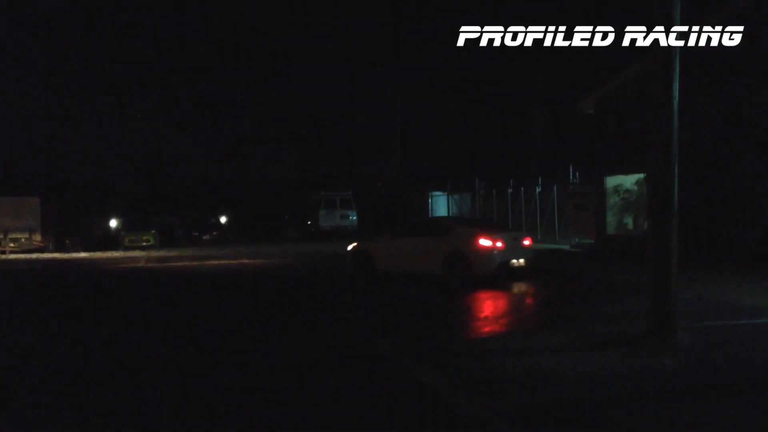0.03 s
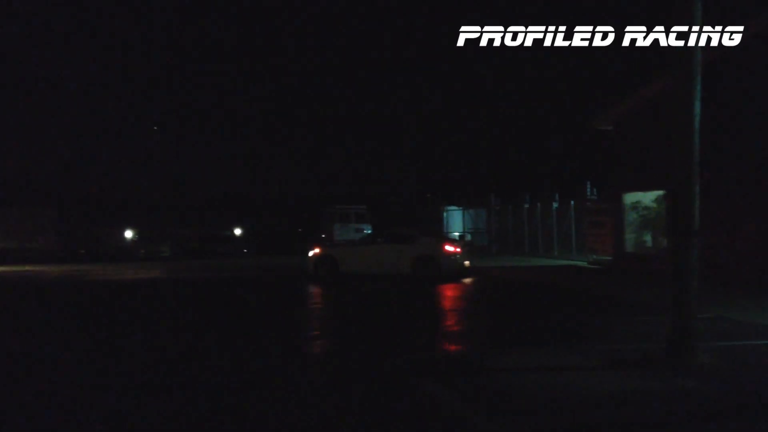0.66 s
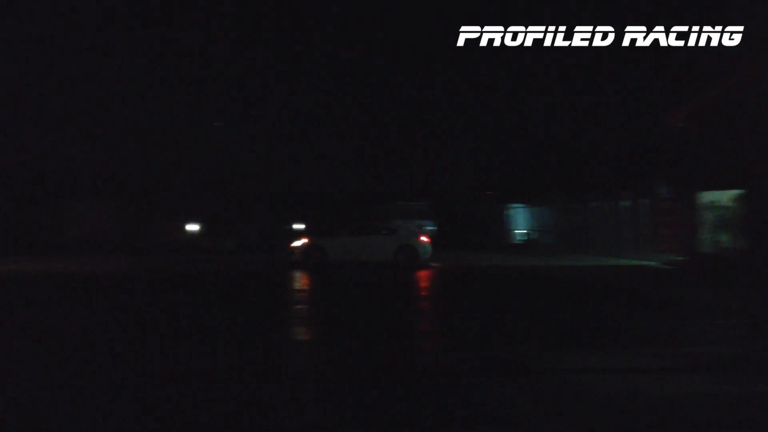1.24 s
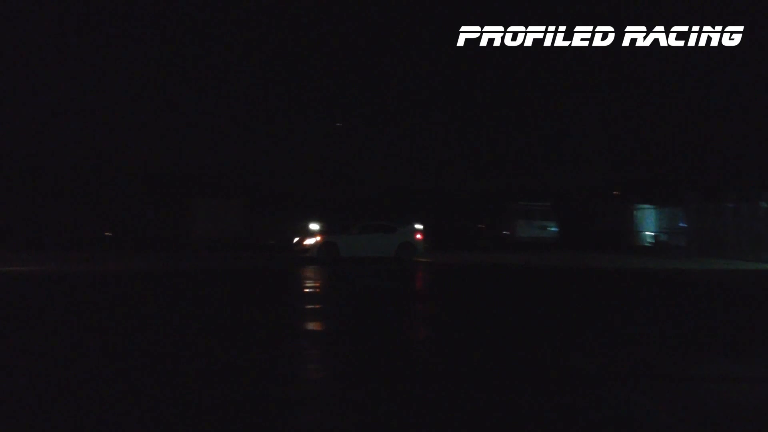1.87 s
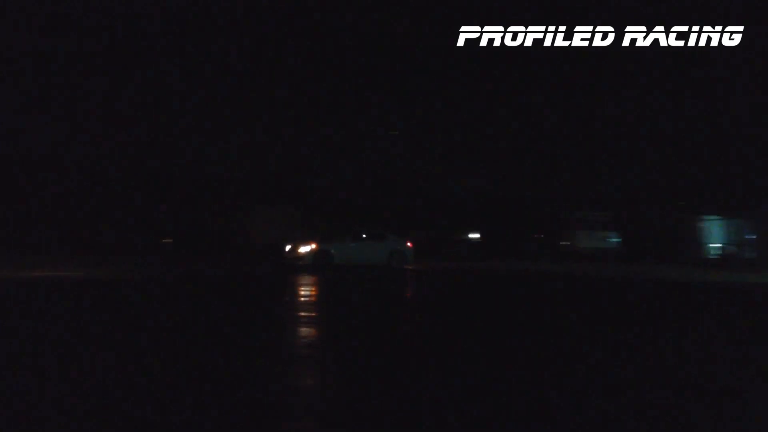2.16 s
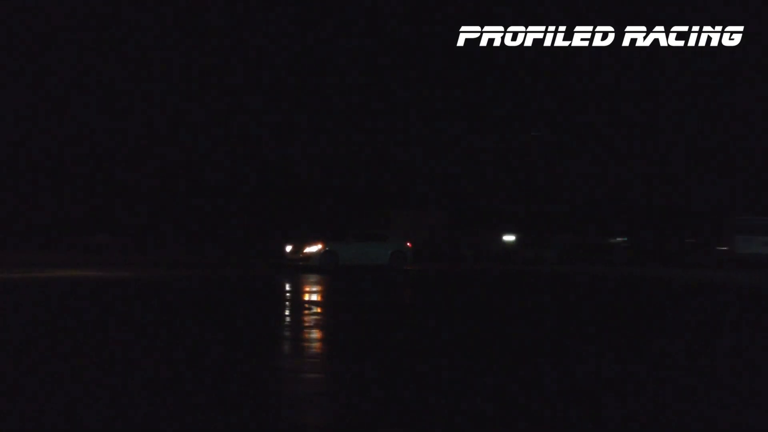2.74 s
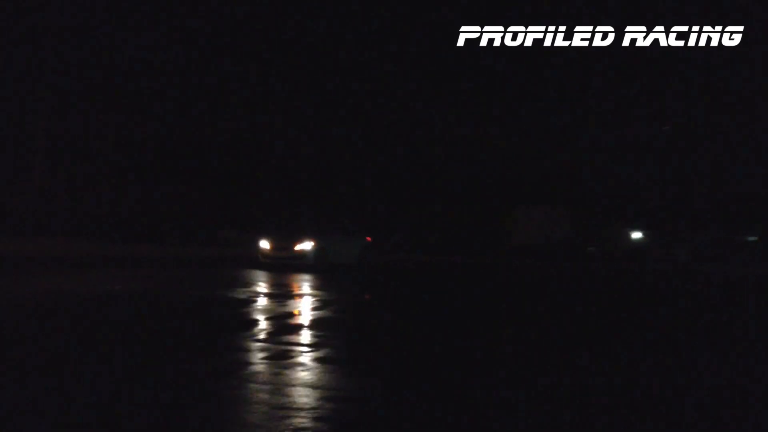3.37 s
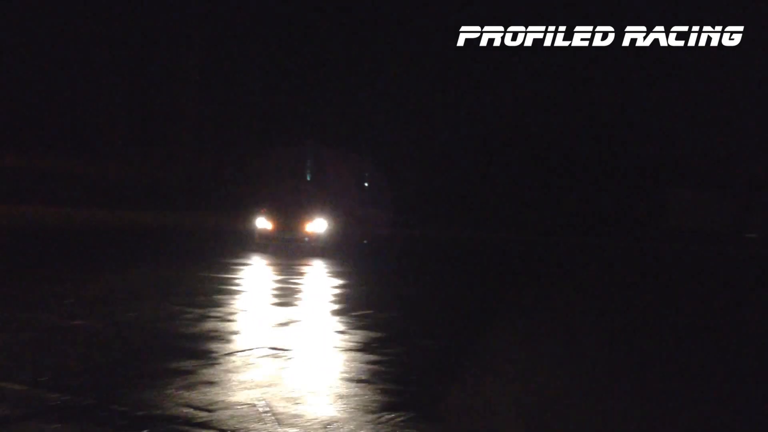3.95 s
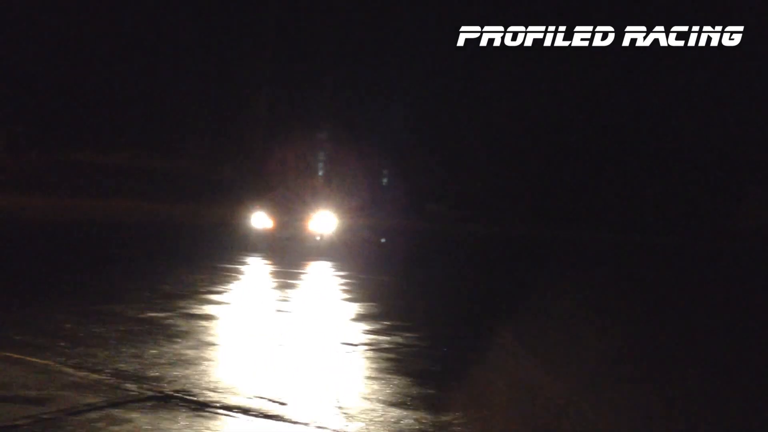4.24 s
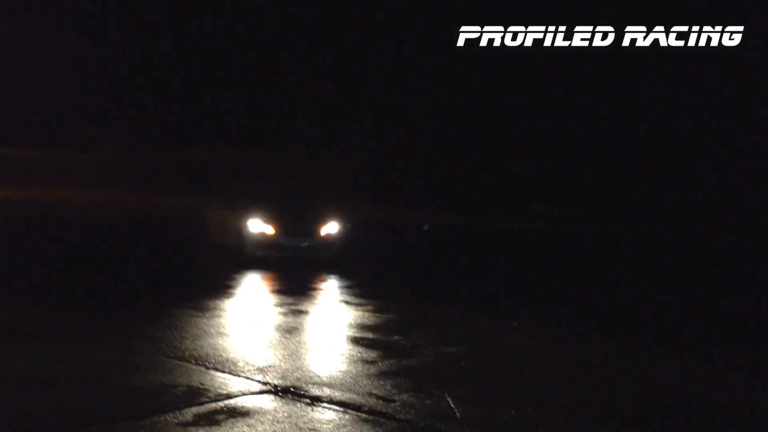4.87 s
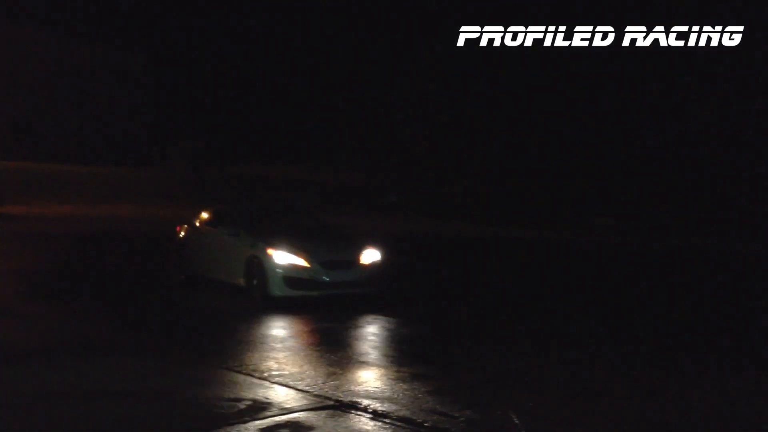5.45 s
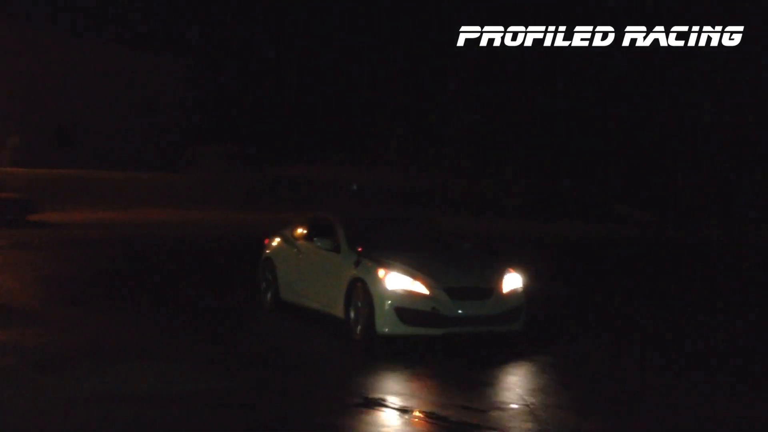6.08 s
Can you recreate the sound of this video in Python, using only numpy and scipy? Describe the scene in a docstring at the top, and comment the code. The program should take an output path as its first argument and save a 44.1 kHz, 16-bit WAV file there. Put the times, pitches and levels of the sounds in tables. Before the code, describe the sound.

Heard from straight ahead in an open lot with a faint echo, a six-cylinder car revs as it slides on wet asphalt. Brief chirps give way to a wavering tyre howl over rubber scrub and hissing water. The engine rises to a raspy roar, then the throttle shuts and the pitch sinks. One more keen squeal and several quick chirps follow, leaving a low idle and light spray.

```python
"""On a wet, open lot a six-cylinder coupe drifts, revs up, lifts off and slides to a crawl.
Periodic firing makes the exhaust drone, burble and rasp, while turbulence roars in the intake.
Stick-slip friction makes the tyres howl, squeal keenly in the last slide and chirp.
Rubber scrubs and spray hisses under the wheels, and distant buildings answer faintly."""
import sys
import numpy as np
from scipy import signal
from scipy.fft import rfft, irfft, next_fast_len
from scipy.io import wavfile
from scipy.ndimage import uniform_filter1d, minimum_filter1d, map_coordinates

SR = 44100
rng = np.random.default_rng(int(sys.argv[2]) if len(sys.argv) > 2 else 0)


def file_out(sig):
    """Save sig as 16-bit WAV at sys.argv[1]."""
    # one column per channel
    cols = np.atleast_2d(sig).T
    # limit, then scale
    lim = np.clip(cols, -1, 1)
    pcm = np.round(lim * 32767).astype(np.int16)
    wavfile.write(sys.argv[1], SR, pcm)


N = 274025


def engine(jitter=.004, pulsation_depth=.063):
    """Periodic excitation: the firing rate sets the exhaust's harmonics and modulates the gas flow."""
    # engine speed: time_s, firing_hz
    engine_speed = [(0, 105.6), (.12, 112.8), (.21, 107), (.38, 103.2), (.5, 95.3), (.68, 97.6),
                    (.85, 92.45), (1.2, 107.7), (1.78, 118.9), (1.97, 115.3), (2.15, 118.2), (2.62, 118.3),
                    (3.02, 126), (3.33, 149.5), (3.6, 156.4), (3.94, 174.7), (4.12, 148.5), (4.29, 126.6),
                    (4.5, 100.4), (4.8, 77.35), (5.13, 61.23), (5.5, 53.4), (6.2, 53.97)]
    firing_hz, = curves(engine_speed)
    revs = firing_hz / 150
    shut = 1 - throttle()
    firings = np.cumsum(firing_hz * (1 + jitter * wobble(35))) / SR
    pulsation = 1 + pulsation_depth * np.cos(2 * np.pi * firings)
    exhaust = drone(firings, firing_hz, revs, shut) + burble(firings, firing_hz, revs, shut)
    return exhaust + rasp(firings, pulsation, revs, shut) + intake(pulsation) + thump()


def throttle(attack_s=.18):
    """A valve meters the air: its opening, 0-1, rises, holds and falls with each press."""
    # two blips, a long pull, a light touch: open_s, until_s, release_s, opening_share
    presses = [(.09, 0.16, 0.21, 0.91), (.61, 0.68, 0.15, 0.9), (.96, 3.854, 0.39, 0.91),
               (4.58, 4.74, .15, 0.13)]
    return sum(curves([(on - attack_s, 0), (on, opening), (off, opening), (off + release, 0)])[0]
               for on, off, release, opening in presses)


def harmonic(firings, k, db, flutter_db=2.5):
    """Periodic firing radiates at whole multiples of its rate; this is the k-th, fluttering in level."""
    return amp(db + flutter_db * wobble(28)) * np.sqrt(2) * np.sin(2 * np.pi * k * firings)


def drone(firings, firing_hz, revs, shut, shut_db=(-16.5, -19, -19.5), lope=.19):
    """Resonance: harmonics 1-3 boom at certain revs; uneven firing shakes them, most at high revs."""
    # exhaust boom at full throttle: firing_hz, first_db, second_db, third_db
    boom = [(54.21, -44, -31, -22.5), (67.46, -48, -17.5, -13), (79.93, -21.5, -15.5, -30.5),
            (91.3, -19.5, -19.5, -22), (109.3, -25.5, -20.5, -22.5), (111, -16.5, -16, -27.5),
            (122, -19.5, -11.5, -27.5), (135.7, -18.5, -15, -34), (145.6, -13, -20, -21),
            (153.75, -12.5, -17.5, -14), (172, -20.5, -19.5, -50), (177.05, -10, -24, -37)]
    # one harmonic briefly swells or fades: centre_s, half_length_s, harmonic_number, gain_db
    swings = [(1.1, 0.17, 2, 8), (1.54, 0.04, 2, -22), (2.38, 0.16, 1, -14.5), (2.646, 0.18, 2, -8),
              (2.87, 0.056, 1, -12), (3.42, 0.056, 1, -16), (3.71, 0.064, 1, -6), (4.643, 0.088, 2, 7.5),
              (6.1, 0.26, 3, 6)]
    # low surges after the throttle shuts: centre_s, half_length_s, level_db
    surges = [(4.004, .03, -15.5), (4.107, 0.038, -20), (4.284, 0.046, -15.5)]
    levels_db = [db + cut_db * shut for db, cut_db in zip(curves(boom, firing_hz), shut_db)]
    for s, half_s, k, db in swings:
        levels_db[round(k) - 1] += db * swell(s, half_s)
    surge = sum(amp(db) * swell(s, half_s) for s, half_s, db in surges)
    levels_db[0] = 20 * np.log10(np.hypot(amp(levels_db[0]), surge))
    tone = sum(harmonic(firings, k, db) for k, db in enumerate(levels_db, 1))
    return tone * (1 + lope * revs ** 2 * wobble(60))


def burble(firings, firing_hz, revs, shut, db_per_octave=3, shut_db=-7):
    """Muffler resonances lift harmonics 4-6 as they pass; at high revs gas noise takes over."""
    # muffler response: frequency_hz, gain_db
    muffler = [(20, -48), (80, -64), (110, -8.5), (150, -7), (210, -5), (295, -2.5), (345, -1.5),
               (405, -7.5), (480, -9.5), (560, -34.5), (1200, -103)]
    # the overtones stand out at middling revs: firing_hz, gain_db
    clarity = [(55, -5), (85, -22), (97, 4), (107, -10.5), (120, -22)]
    # the burble swells as the revs fall: centre_s, half_length_s, gain_db
    overrun = (4.27, 0.22, 6.9)
    overtones = sum(harmonic(firings, k, along(muffler, k * firing_hz) + 2 * wobble(6))
                    for k in (4, 5, 6))
    gas = np.sqrt(revs) * rush(muffler, patchy_db=1)
    level_db = -24 + db_per_octave * np.log2(revs) + shut_db * shut + overrun[2] * swell(*overrun[:2])
    return amp(level_db) * (amp(curves(clarity, firing_hz)[0]) * overtones + gas)


def rasp(firings, pulsation, revs, shut, pulse_share=.25, db_per_octave=7, shut_db=-14):
    """Pipe resonances colour the firing pulses and the turbulent flow, louder as the revs climb."""
    # pipe response: frequency_hz, gain_db
    pipe = [(330, -21), (420, 0), (490, -2), (600, -6.5), (790, 2.5), (980, -5.5), (1250, -8), (1700, -11),
            (2300, -28.5), (5000, -85)]
    pulses = np.sqrt(pulse_share) * coloured(pipe_pulses(firings), pipe)
    flow = np.sqrt(1 - pulse_share) * unit(pulsation * rush(pipe, patchy_db=1))
    return amp(-17.5 + db_per_octave * np.log2(revs) + shut_db * shut) * (pulses + flow)


def pipe_pulses(firings, uneven=.29, t60_s=.034):
    """Reflections in the pipe smear an impulse train: one pulse a firing, sized by its cylinder."""
    fired = np.flatnonzero(np.diff(np.floor(firings)))
    cylinders = np.resize(1 + uneven * unit(rng.standard_normal(6)), len(fired))
    pulses = np.zeros(N)
    pulses[fired] = cylinders * amp(2 * rng.standard_normal(N)[fired])
    t = np.arange(SR // 25) / SR
    echoes = rng.standard_normal(len(t)) * amp(-60 * t / t60_s)
    return signal.fftconvolve(pulses, echoes)[:N]


def intake(pulsation):
    """Pulsating turbulence roars through the resonances of the airbox."""
    # airbox response: frequency_hz, gain_db
    airbox = [(500, -36), (850, -11), (1200, 2), (1400, -0.5), (1600, -1.5), (1950, -9.5), (2500, -15),
              (4000, -60)]
    # intake roar: time_s, level_db
    roar = [(0, -25.5), (1, -28), (1.6, -21.5), (3.5, -23), (3.95, -20), (4.1, -25.5), (4.4, -21.5),
            (4.9, -22.5), (5.1, -23), (5.7, -33), (6.2, -43.5)]
    return amp(curves(roar)[0]) * unit(pulsation * rush(airbox, patchy_db=3.5))


def thump(lift_off_s=3.985, ring_hz=115, gain_db=-11, rise_s=.023, t60_s=.25):
    """Damped oscillation: a soft puff rings the muffler as the throttle shuts."""
    t = np.maximum(np.arange(N) / SR - lift_off_s, 0)
    return amp(gain_db - 60 * t / t60_s) * (1 - np.exp(-t / rise_s)) * np.sin(2 * np.pi * ring_hz * t)


def tyres(judder_db=1.73, judder_per_s=24):
    """Friction drives chirps and long slides, which judder as grip varies; returns sound and screech."""
    # short skids: start_s, end_s, pitch_hz, glide_hz_per_s, level_db, lead_share, screech_db,
    # second_db, third_db, fourth_db
    chirps = [(0.086, 0.167, 1157, 459, -17, 0.27, -18, -8, -15, -17.5),
              (.428, 0.473, 1243, -2, -16.5, 0.1, -14.5, -5.5, -10.5, -18),
              (0.798, 0.813, 3060, 2500, -32, 0.87, -18, -30, -40, -38),
              (1.007, 1.127, 1190, -4, -14, 0.56, -19.5, -7.5, -12.5, -12.5),
              (5.13, 5.2, 1246, 894, -11, 0.92, -15, -16.5, -12.5, -48),
              (5.272, 5.279, 1255, -900, -15.5, 0.27, -12, -42, -27, -37),
              (5.375, 5.393, 1192, 596, -13, 0.56, -10.5, -21, -8.5, -25),
              (5.521, 5.54, 1234, -800, -17, 0.64, -14, -30, -12, -32)]
    # wheelspin howl, the whistle above it and the last slide's squeal: time_s, pitch_hz, level_db
    howl = [(1.18, 1315, -11.5), (1.24, 1270, -20), (1.31, 1195, -11.5), (1.42, 1382, -20.5),
            (1.52, 1254, -11.5), (1.64, 1466, -16.5), (1.79, 1201, -15.5), (2.15, 1256, -13),
            (2.35, 1273, -19), (2.6, 1315, -14), (2.73, 1443, -14), (3.0, 1318, -15.5), (3.1, 1325, -25.5)]
    whistle = [(1.35, 2560, -25.5), (1.62, 2665, -23), (1.82, 2534, -33), (2.54, 2670, -22.5),
               (2.75, 2843, -18.5), (2.95, 2730, -26.5)]
    squeal = [(4.28, 1220, -26.5), (4.37, 1145, -29), (4.48, 1105, -17), (4.6, 1115, -11.5),
              (4.69, 1115, -12.5), (4.795, 1162, -15), (4.82, 1271, -24), (4.84, 1105, -10),
              (4.87, 1129, -15), (4.9, 1220, -12.5), (5.0, 1200, -13)]
    # the tread in each: gain_db, spread_share, lead_share, screech_db, overtones_db
    howl_tread = (-2.6, .08, 0.35, -16, [-10.5, -13, -23.5])
    whistle_tread = (-1.2, .045, 0.091, -18.5, [-16, -24])
    squeal_tread = (-1, .052, 0.67, -13, [-16.5, -6.5, -26])
    # the rubber bites harder: centre_s, half_length_s, gain_db
    bites = [(4.719, 0.0087, 10), (4.762, 0.0092, 3), (4.848, 0.011, 8), (4.897, 0.0056, 10.5)]
    out = sum(chirp(*row) for row in chirps)
    grip_db = judder_db * wobble(judder_per_s) + sum(db * swell(s, half_s) for s, half_s, db in bites)
    for path, (gain_db, *tread) in [(howl, howl_tread), (whistle, whistle_tread), (squeal, squeal_tread)]:
        out = out + skid(path, gain_db + grip_db, *tread)
    return out


def skid(path, grip_db, spread, lead, screech_db, upper_db, count=5, attack_s=.047, release_s=.042):
    """Detuned tread blocks beat around a purer leading tone; returns sound and screech envelope."""
    start, end = path[0][0], path[-1][0]
    span = np.arange(max(0, int((start - 2 * attack_s) * SR)), min(N, int((end + 2 * release_s) * SR)))
    t = span / SR
    pitch_hz, db = curves(path, t)
    edges_db = 20 * np.minimum(0, np.minimum((t - start) / attack_s, (end - t) / release_s))
    leader = stick_slip(pitch_hz, np.add(upper_db, -2), jitter=.012, flicker_db=1.2)
    blocks = 0
    for place in np.linspace(-1.3, 1.3, count):
        detune = spread * (place + .3 + .5 * wobble(14, len(span)))
        blocks += stick_slip(pitch_hz * (1 + detune), upper_db, jitter=.022, flicker_db=3.5)
    sound, envelope = np.zeros((2, N))
    envelope[span] = amp(db + edges_db + grip_db[span])
    sound[span] = envelope[span] * (np.sqrt(lead) * leader + np.sqrt((1 - lead) / count) * blocks)
    return np.array([sound, amp(screech_db) * envelope])


def stick_slip(pitch_hz, upper_db, jitter, flicker_db):
    """Relaxation oscillation: rubber grips and lets go in a shaky tone whose harmonics flare apart."""
    size = len(pitch_hz)
    waver = .6 * wobble(70, size) + 1.08 * wobble(480, size)
    phase = 2 * np.pi * np.cumsum(pitch_hz * (1 + jitter * waver)) / SR
    grip_db = flicker_db * wobble(110, size)
    return sum(amp(db) * unit(amp(grip_db + np.sqrt(k + 1) * wobble(71.4, size)) * np.sin(k * phase))
               for k, db in enumerate([0, *upper_db], 1))


def chirp(on, off, hz, glide, db, lead, screech_db, *upper_db, sag=.0363, spread=.034):
    """A brief burst of stick-slip whose pitch glides and sags in the middle."""
    end_hz = hz + glide * (off - on)
    path = [(on, hz, db), ((on + off) / 2, (1 - sag) * (hz + end_hz) / 2, db), (off, end_hz, db)]
    return skid(path, np.zeros(N), spread, lead, screech_db, upper_db)


def road(screech, screech_spray_db=-4, treble_hz=8800):
    """Friction noise and spray grow with each screech; directivity dulls the spray as the car turns."""
    # wheelspin and sliding: time_s, scrub_db, spray_db
    sliding = [(0, -31.5, -33.5), (.85, -34, -35.5), (1.25, -33.5, -37.5), (1.65, -22.5, -36),
               (2.2, -26, -44), (2.8, -20.5, -41.5), (3.12, -31, -34.5), (3.9, -21.5, -27.5),
               (4.15, -29.5, -36), (4.48, -26, -38), (4.87, -22.5, -29), (5.07, -35, -33.5),
               (5.72, -33, -33), (5.92, -40.5, -40), (6.2, -38, -38)]
    # spectra of rubber on asphalt and of thrown water: frequency_hz, density_db
    rubber = [(1200, -16.5), (2150, -15.5), (2650, 9), (3400, 11.5), (3900, 6.5), (4500, -0.5),
              (5000, -11.5), (6500, -73)]
    water = [(2500, -7.5), (4400, 0), (5050, -8), (5700, 1.5), (6600, 1.5), (7700, -7.5), (8600, -4),
             (9500, -13), (10400, -25), (11700, -10), (12600, -32), (13500, -37)]
    # the car turns away and back: time_s, treble_db
    facing = [(0, 1.5), (.9, 0.5), (1.2, -12.5), (2.2, -56), (2.9, -9.5), (3.5, -1), (4.2, 6), (5, -0.5),
              (6.2, 7.5)]
    scrub_db, spray_db = curves(sliding)
    scrub = np.hypot(amp(scrub_db), screech) * rush(rubber, patchy_db=3)
    spray = np.hypot(amp(spray_db), amp(screech_spray_db) * screech) * rush(water, patchy_db=3)
    treble = filtered(spray, lambda hz: 1 - 1 / (1 + (hz / treble_hz) ** 8))
    return scrub + spray + (amp(curves(facing)[0]) - 1) * treble


def lot(x):
    """Diffuse reflection: the buildings answer after 25 ms, and the treble dies first."""
    # reverberation time: frequency_hz, t60_s
    decay = [(100, 1), (1200, 0.27), (4000, 0.053), (10000, 0.024)]
    hz, t, noise = signal.stft(rng.standard_normal(SR * 3 // 4), SR, nperseg=256)
    tail = signal.istft(noise * amp(-60 * t / along(decay, hz)[:, None]), SR, nperseg=256)[1]
    return signal.fftconvolve(np.pad(x, (SR // 40, 0)), tail / np.linalg.norm(tail))[:N]


def rush(spectrum, patchy_db):
    """Turbulence: noise of rms 1 with short patches of random gain."""
    noise = signal.stft(rng.standard_normal(N), nperseg=1024)[2]
    patches = uniform_filter1d(rng.standard_normal(noise.shape), size=4, axis=0)
    patches = unit(uniform_filter1d(patches, size=4, axis=1))
    return coloured(signal.istft(noise * amp(patchy_db * patches), nperseg=1024)[1][:N], spectrum)


def coloured(x, spectrum):
    """Source and filter: x shaped by a spectrum, at rms 1."""
    return unit(filtered(x, lambda hz: amp(along(spectrum, hz))))


def filtered(x, response):
    """Linear filtering: the spectrum of x times a frequency response."""
    size = next_fast_len(N + SR // 4)
    return irfft(rfft(x, size) * response(np.fft.rfftfreq(size, 1 / SR)), size)[..., :N]


def wobble(rate, size=N):
    """Random modulation: a smooth curve with rate knots a second."""
    knots = np.random.default_rng(rng.integers(2 ** 31)).standard_normal(int(size * rate / SR) + 4)
    coarse = np.arange(0, size + 16, 16)
    spline = map_coordinates(knots, [coarse * rate / SR], mode="nearest")
    return np.interp(np.arange(size), coarse, spline)


def swell(centre_s, half_s):
    """A Gaussian envelope of height 1."""
    return np.exp(-((np.arange(N) / SR - centre_s) / half_s) ** 2)


def curves(rows, at=None):
    """Linear interpolation of each later column along the first, by default at every sample time."""
    knots, *columns = np.transpose(rows)
    return [np.interp(np.arange(N) / SR if at is None else at, knots, column) for column in columns]


def along(points, hz):
    """Interpolation on a logarithmic frequency axis."""
    knots_hz, values = np.transpose(points)
    return np.interp(np.log(hz + 1), np.log(knots_hz + 1), values)


def amp(db):
    """Decibels to amplitude ratio."""
    return np.exp(np.asarray(db) * (np.log(10) / 20))


def unit(x):
    """Normalisation to rms 1."""
    return x / np.sqrt(np.mean(x ** 2) + 1e-20)


def scene():
    """Superposition: the car stays straight ahead; the treble has a little width."""
    # side signal relative to the middle: frequency_hz, gain_db
    width = [(60, -51), (200, -61.5), (1500, -47.5), (4400, -28.5), (12000, -12)]
    squeal, screech = tyres()
    motor = engine()
    echo = lot(amp(-19) * squeal + amp(-24) * motor)
    mid = motor + squeal + road(screech) + echo
    side = filtered(lot(mid), lambda hz: amp(along(width, hz)))
    return np.array([mid + side, mid - side])


def record(dry, low_cut_hz=55, top_hz=13500, ceiling=.95):
    """Band and peak limiting: the deep bass thins, the highest peaks duck and the top treble is cut."""
    thinned = filtered(dry, lambda hz: hz / np.hypot(hz, low_cut_hz))
    needed = np.minimum(1, ceiling / (np.abs(thinned).max(axis=0) + 1e-9))
    gain = uniform_filter1d(minimum_filter1d(needed, size=331), size=331)
    return filtered(thinned * gain, lambda hz: hz < top_hz)


dry = scene()
out = record(dry)
file_out(out)
```